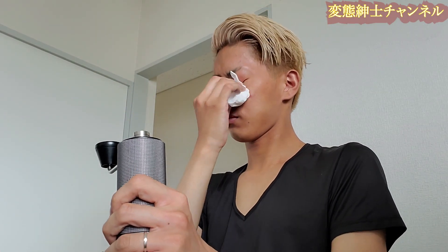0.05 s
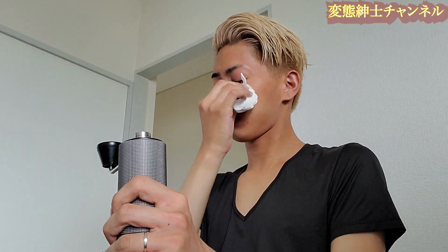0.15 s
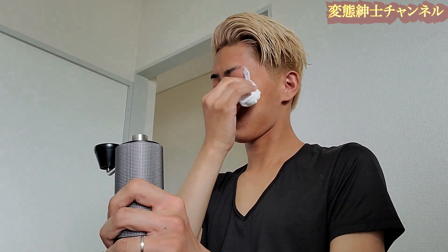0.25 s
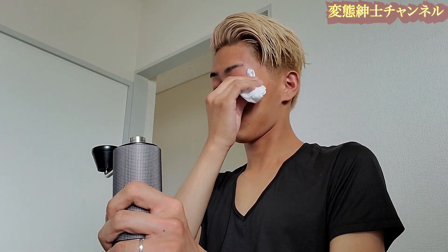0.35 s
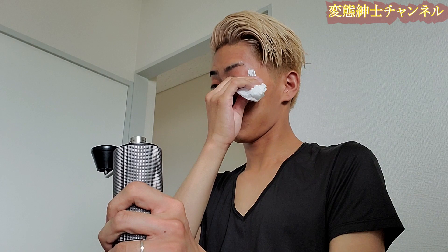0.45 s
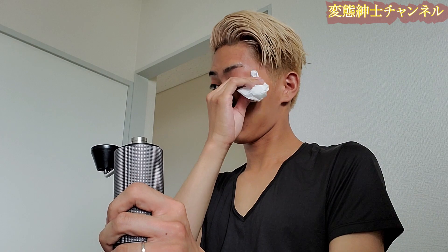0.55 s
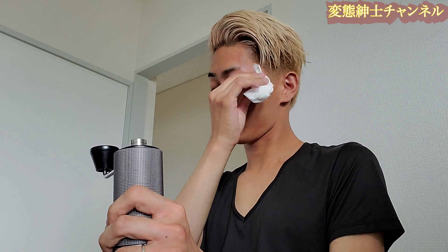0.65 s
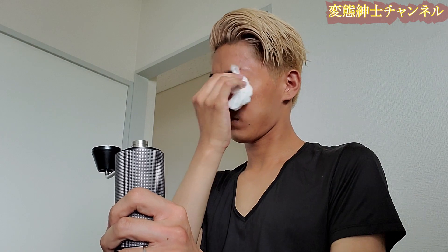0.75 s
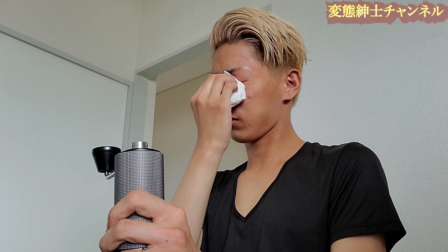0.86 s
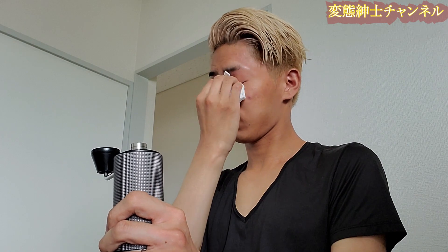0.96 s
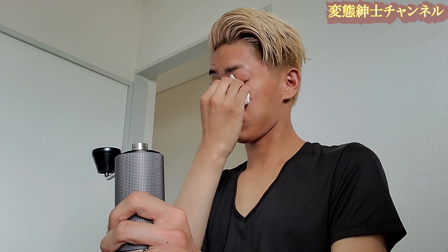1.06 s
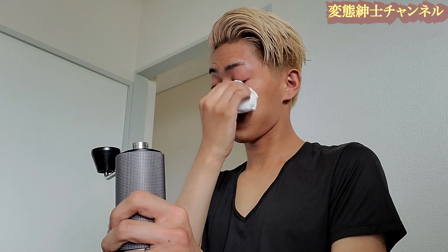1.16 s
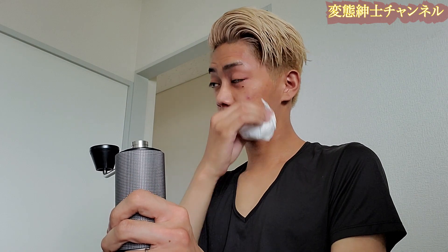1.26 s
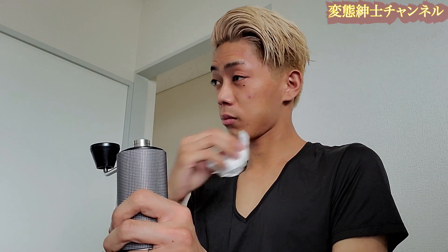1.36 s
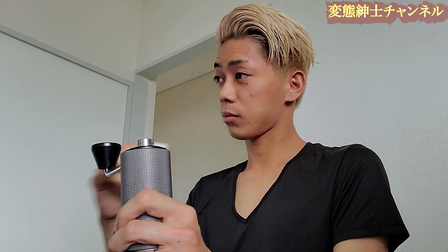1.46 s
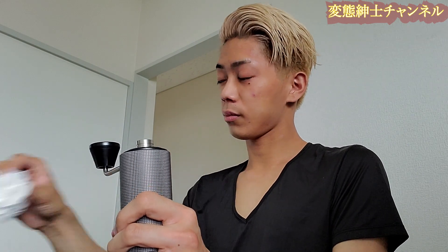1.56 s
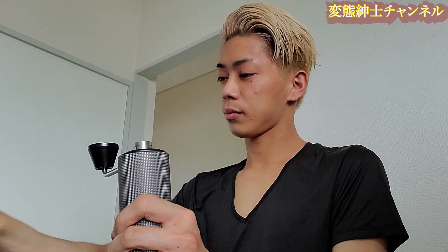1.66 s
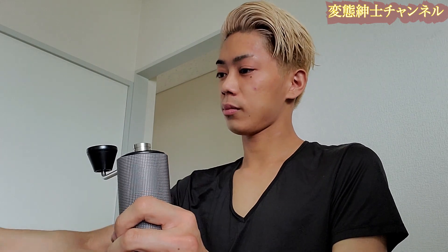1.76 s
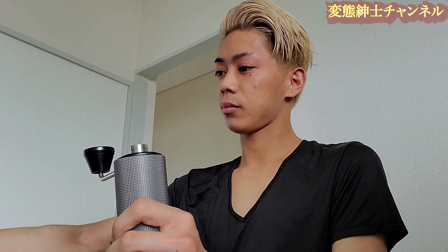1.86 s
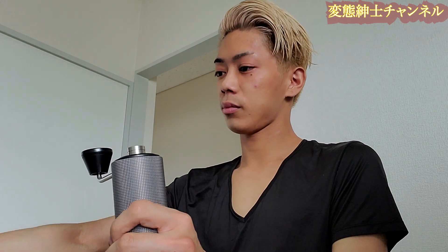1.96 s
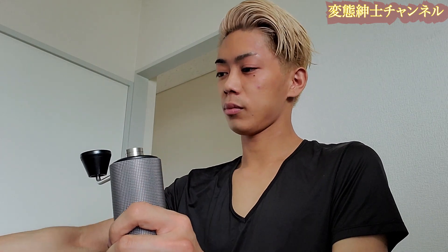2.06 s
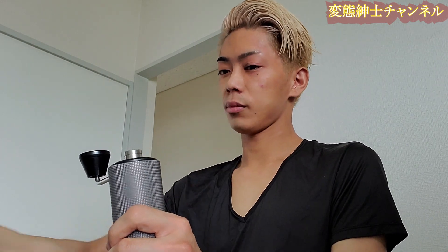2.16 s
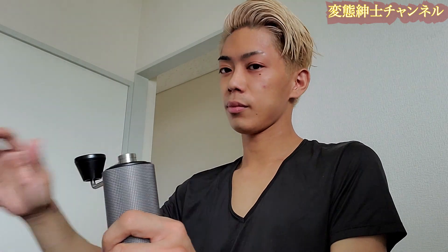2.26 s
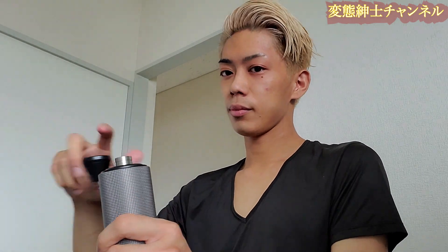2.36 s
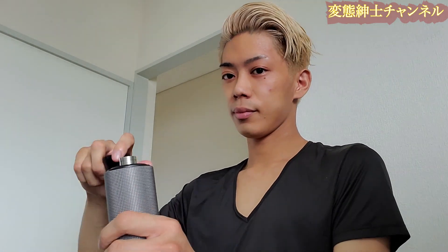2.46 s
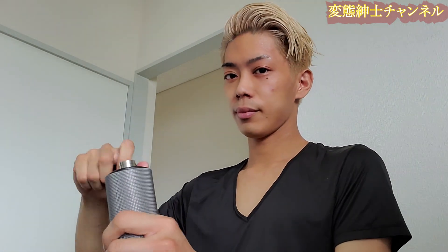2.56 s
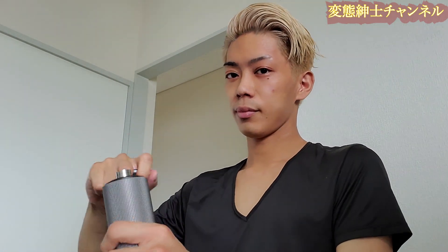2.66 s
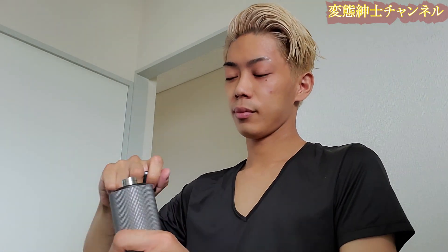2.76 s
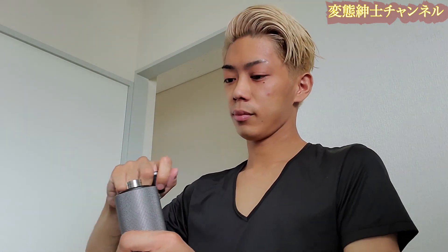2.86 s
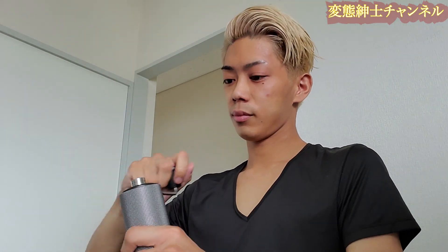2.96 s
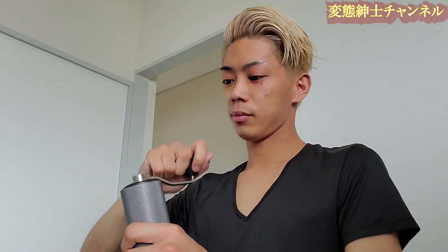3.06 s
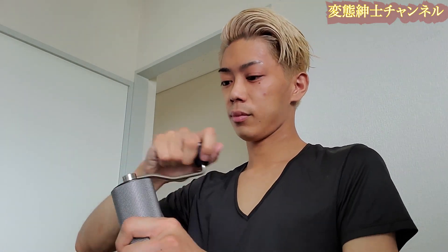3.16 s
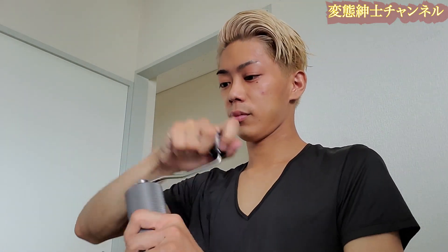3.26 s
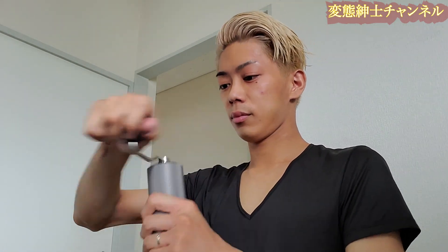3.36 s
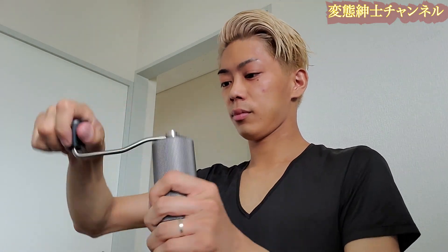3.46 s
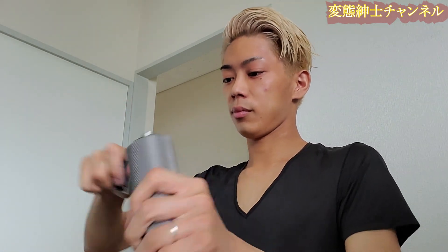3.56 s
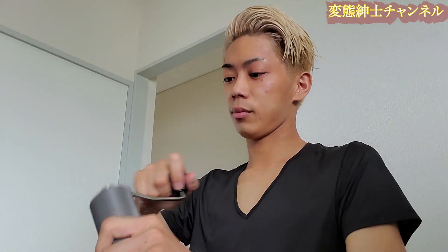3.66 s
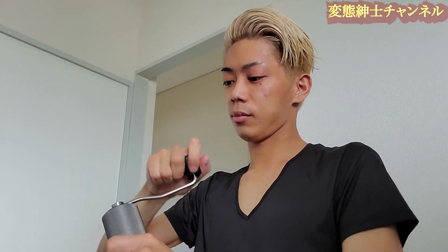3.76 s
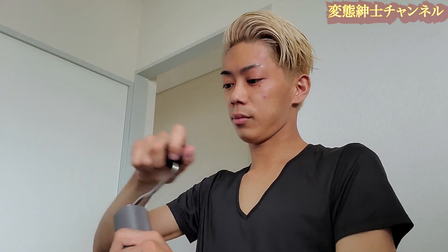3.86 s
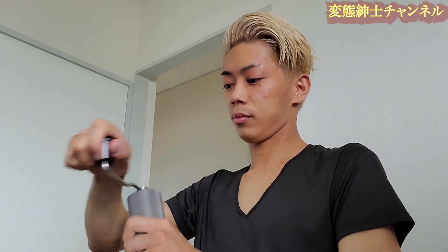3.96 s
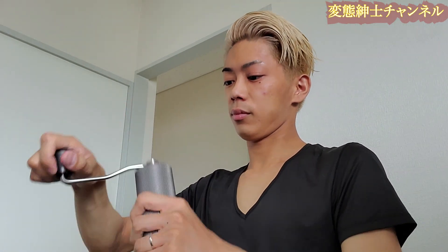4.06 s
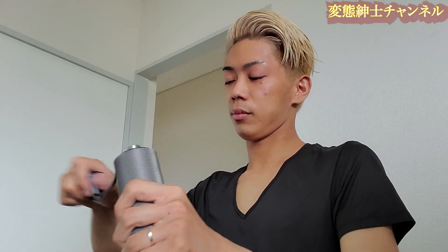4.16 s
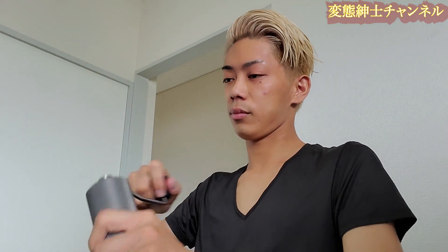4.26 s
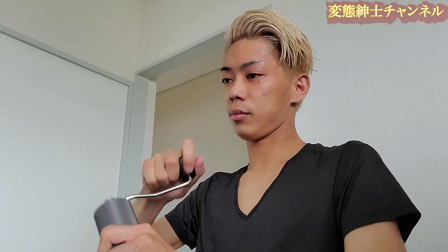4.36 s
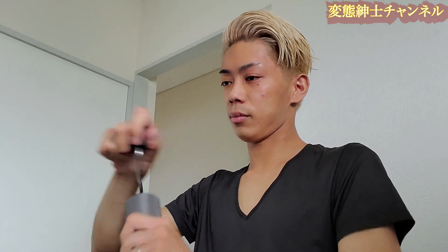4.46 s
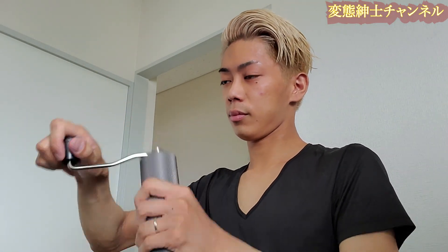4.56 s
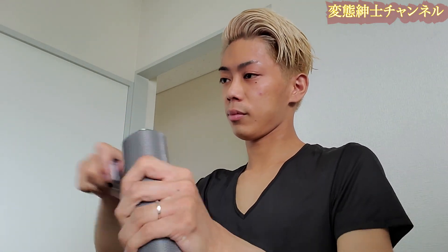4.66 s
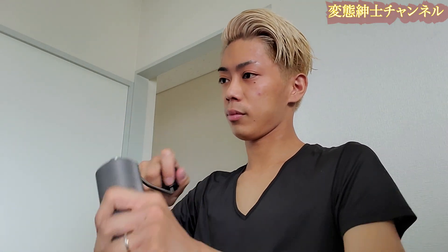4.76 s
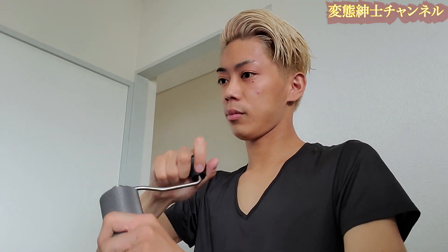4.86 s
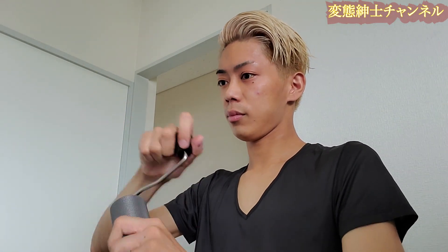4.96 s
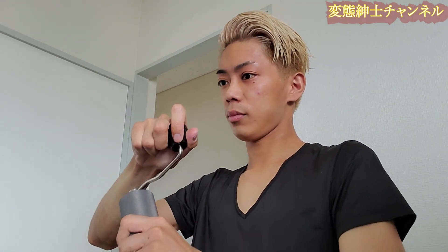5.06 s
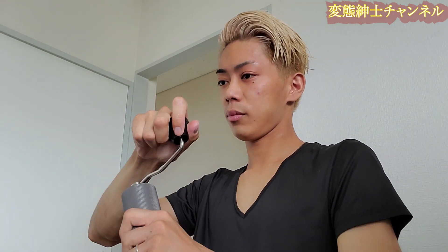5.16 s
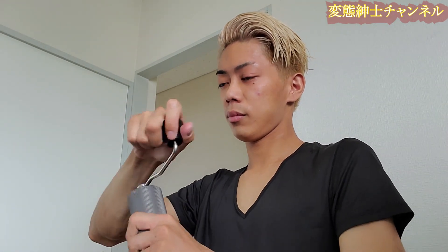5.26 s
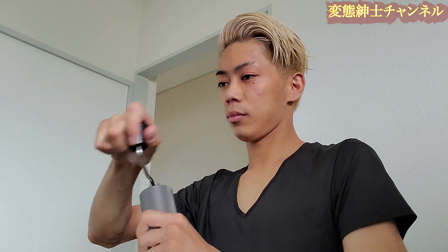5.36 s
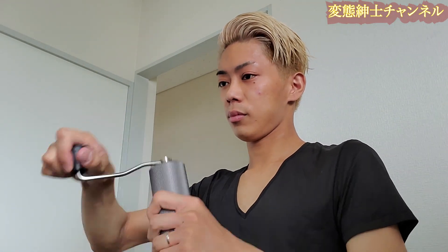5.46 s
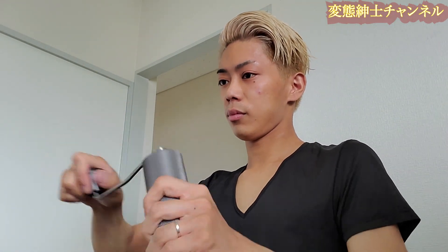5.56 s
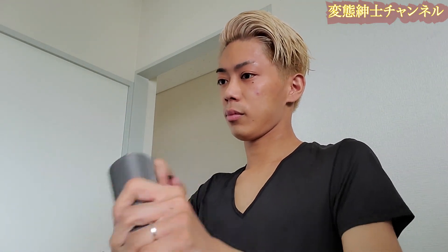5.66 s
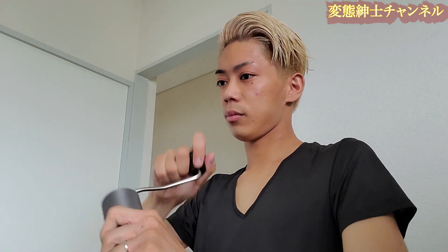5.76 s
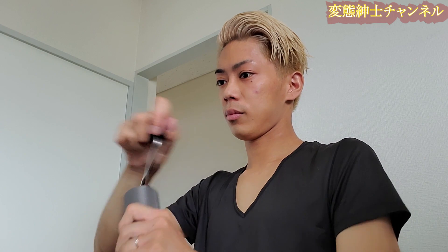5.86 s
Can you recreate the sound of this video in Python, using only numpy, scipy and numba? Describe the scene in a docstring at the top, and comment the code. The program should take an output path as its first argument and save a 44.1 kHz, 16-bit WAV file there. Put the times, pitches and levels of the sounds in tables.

```python
"""Hand-cranked coffee mill

A metal mill grinds in a small quiet room: random fractures excite the damped modes of its body.
Off to the right a tissue wipes skin in two strokes of filtered noise, and something lands on a shelf with a thud.
The handle clicks, then beans crack between the burrs; the table is bumped twice and the crank stalls once.
Two microphones hear it all, and a gain control ducks under the grinding."""
import sys
import numpy as np
from scipy import signal
from scipy.fft import rfft, irfft, next_fast_len
from scipy.io import wavfile
from scipy.ndimage import uniform_filter1d, map_coordinates
from numba import njit

SR = 44100
rng = np.random.default_rng(int(sys.argv[2]) if len(sys.argv) > 2 else 0)


def wrap_up_sound(samples):
    """Save the sound to the file named by the first command line argument, as 16-bit audio."""
    columns = np.atleast_2d(samples).T
    # keep every value between -1 and 1, then stretch to whole-number steps
    tamed = np.clip(columns, -1, 1)
    steps = np.round(tamed * 32767).astype(np.int16)
    wavfile.write(sys.argv[1], SR, steps)


def undo_db(level):
    """Turn decibels back into plain size, where 20 dB means ten times bigger."""
    steps = np.asarray(level, float) / 20
    return 10 ** steps


N = 261072

# Levels in the tables are relative: each source sets its own reference.
# Spectrum of the room's air noise: frequency_hz, density_db (per Hz)
AIR_SPECTRUM = [(20, 4), (45, 5), (200, -3.5), (400, -9.5), (800, -4.5), (1400, -14), (2800, -13.5),
                (4500, -19), (5400, -23.5), (16000, -34)]
# Hum bands: frequency_hz, width_hz, level_db
HUM_BANDS = [(111, 3.2, -54), (339, 27, -59), (444, 3.3, -56.5), (6700, 170, -75), (11000, 420, -71)]
# Decay of the room's answer: frequency_hz, t60_s
WALL_DECAY = [(100, 0.34), (1000, 0.21), (4000, 0.34), (12000, 0.027)]
# Left-right likeness of the sources in front: frequency_hz, likeness (0 to 1)
LIKENESS_FRONT = [(100, 0.94), (500, 0.94), (1500, 0.72), (4000, 0.69), (5500, 0.024), (15000, 0.024)]
# Left-right likeness of the sources on the right and the room: frequency_hz, likeness (0 to 1)
LIKENESS_RIGHT = [(100, 0.93), (300, 1), (600, 0.79), (1400, 0.23), (3000, 0.24), (6000, 0.043),
                  (15000, 0.14)]
# Modes of the table top: frequency_hz, level_db, t60_s
TABLE_MODES = [(124, 0, 0.023), (176, 0.5, 0.061), (234.7, 0.5, 0.055), (356, -2.5, 0.063),
               (436, -3, 0.033), (704, -14.5, 0.044)]
# Bumps of the table: start_s, level_db, bounce_db (re first blow)
TABLE_BUMPS = [(3.664, 3.5, -5.5), (4.279, -2.5, 6)]
# Jolts of an arm on the table: peak_s, level_db
ARM_JOLTS = [(2.44, -45.5), (2.56, -46.5), (2.75, -40.5), (3.17, -48.5), (3.62, -24), (4.07, -27),
             (4.5, -31)]
# Deep passing rumble, one row: start_s, held_s, level_db
DEEP_RUMBLE = (1.68, 1.7, -47)
# Landing on the shelf, first touch and full weight: start_s, level_db, held_s
LANDINGS = [(1.834, -31.5, 0.094), (1.923, -17, 0.044)]
# Modes of the hollow shelf: frequency_hz, width_hz, level_db
SHELF_MODES = [(60, 40, -8), (128, 28, 2), (182, 14, 5), (280, 90, -14)]
# Spectrum of rustling: frequency_hz, density_db (per Hz)
RUSTLE_SPECTRUM = [(710, -30), (1200, -4.5), (3180, -5.5), (4130, -7), (6370, -17), (11200, -20.5),
                   (16000, -29)]
# Things shift under the hand or after a bump: start_s, level_db
SHIFTS = [(.045, -47), (1.021, -40), (2.73, -39), (3.666, -12), (4.279, -10)]
# Strokes of the tissue on skin: start_s, middle_of_full_stroke_s, full_stroke_lasts_s, level_db
WIPE_STROKES = [(0.55, 0.76, 0.088, -26.5), (1.023, 1.185, 0.071, -25)]
# Spectrum of the tissue's hiss on skin: frequency_hz, density_db (per Hz)
TISSUE_SPECTRUM = [(600, -44), (1000, -22), (3200, -19), (4400, -17), (6300, -23), (8200, -15), (11000, -4),
                   (12800, 0), (15300, -5), (16000, -9)]
# Clicks of the crank handle: start_s, level_db, favoured_hz
HANDLE_CLICKS = [(2.337, -10, 2340), (2.392, -22, 1000), (2.429, -26, 1310), (2.594, -23.5, 2150),
                 (2.665, -35.5, 2400), (2.811, -23.5, 2220)]
# Modes of the handle: frequency_hz, level_db, t60_s
HANDLE_MODES = [(997, -8.5, .06), (1690, -6.5, 0.032), (1900, -2.5, 0.027), (2150, -7, 0.041),
                (2366, -2, 0.034), (2790, -7, 0.043), (3140, 0.5, 0.022), (3950, -12, 0.051),
                (5370, -35, .04)]
# Fingers slide on the body before the turn, one row: start_s, held_s, level_db
FINGER_SLIDE = (2.34, .5, -54)
# Whole beans split: start_s, level_db, pitch_hz, snap_db (re the body's part)
BEAN_CRACKS = [(2.881, -24, 2580, -40), (2.901, -16, 2440, -36), (2.959, -19.5, 2890, -26),
               (2.992, -12.5, 2530, -25), (3.017, -17, 2500, -34), (3.076, -15, 2440, -31),
               (3.107, -17, 1120, -22), (3.219, -13, 2230, -25), (3.499, -8.5, 2440, 2),
               (3.786, -5, 2900, -16), (3.891, -26.5, 2200, -49), (4.532, -2.5, 960, -35),
               (4.804, -12, 2960, -42), (4.921, -6, 2300, -19), (5.265, -50, 1120, -29),
               (5.277, -12, 2620, -25), (5.376, -15.5, 1130, -15), (5.481, -9, 2500, -31),
               (5.782, -11, 3000, -13)]
# Modes of the mill's body: frequency_hz, width_hz, level_db
BODY_MODES = [(1018, 206, -1.5), (1170, 294, -7), (2080, 435, -5), (2440, 280, -5), (2740, 300, -8),
              (3280, 570, -10), (3884, 346, -7.5), (4420, 310, -11)]
# Push on the crank: time_s, push_db
CRANK_PUSH = [(2.8, -54), (2.895, -57.5), (2.905, -45.5), (2.96, -35.5), (3.08, -32.5), (3.15, -29),
              (3.26, -25.5), (3.5, -23), (3.65, -27), (3.72, -32), (3.95, -27.5), (4.24, -25.5),
              (4.44, -30), (4.64, -26), (4.85, -29.5), (4.96, -26), (5.02, -42), (5.2, -72.5), (5.257, -88),
              (5.263, -34), (5.48, -29.5), (5.56, -28.5), (5.7, -25.5), (5.8, -28.5), (5.9, -25),
              (5.92, -29)]
# Burrs run empty: start_s, end_s, dip_db
EMPTY_BURRS = [(2.938, 2.955, -24), (2.981, 2.989, -16), (3.03, 3.084, -35), (3.086, 3.096, -18),
               (3.189, 3.219, -13), (4.746, 4.794, -5), (4.872, 4.922, -9), (5.282, 5.297, -13),
               (5.333, 5.364, -11)]
# Spectrum of the rubbing burrs: frequency_hz, density_db (per Hz)
BURR_SPECTRUM = [(2590, -6), (4400, -5.5), (4850, -3), (6020, -8), (6530, -2), (7550, -7), (8690, -1),
                 (9420, -5.5), (11600, -1), (13500, -3.5), (16000, -15)]
# Brief swells of the bright rub: peak_s, lift_db
RUB_SWELLS = [(3.29, 4), (3.5, 7), (4.13, 5.5), (4.62, 3), (5.55, 5.5)]
# Modes of the grounds cup, whose response is squared in use: frequency_hz, width_hz, level_db
CUP_MODES = [(514, 235, 2), (667, 250, 2)]
# Mode of the loosely held lid, one row: frequency_hz, width_hz, level_db (re crunch)
LID_MODE = (2435, 62, -9)
# The lid sings louder: peak_s, lift_db
LID_SWELLS = [(2.86, 11), (3.33, 8.5), (5.05, 7), (5.9, 6.5)]

RIGHT_LAG_S = 0.000426  # sound from the right reaches the left microphone late
TOP_HZ = 15800  # upper limit of the microphones
REST_DB = -54.5  # tremble of the table under resting arms, before it wobbles
JOLT_RISE_S, JOLT_T60_S = 0.085, 0.45
RUMBLE_RISE_S, RUMBLE_T60_S = 0.1, 1.1
THUD_RISE_S, SHELF_T60_S = 0.0045, 0.41
KNOCK_DB, KNOCK_T60_S = -4.5, 0.48  # re the full weight
THUD_RUSTLE_DB, THUD_RUSTLE_T60_S = -13, 0.64  # re the full weight
SHIFT_RISE_S, SHIFT_T60_S = 0.0065, 0.29
PRESS_DELAY_S, WIPE_T60_S = 0.036, 0.23  # the tissue presses a little after it touches
TOUCH_DB, PRESS_DB = -29, -14.5  # light touch and first press, re full stroke
CLICK_WIDTH_HZ, SCRAPE_S, EDGE_DB = 740, 0.0067, -27  # favoured band, contact time, bright edge
RUB_DB, RUB_PIVOT_DB = -30.5, -27  # rub level at the pivot push
RUB_FOLLOWS, RUB_SLACK = 0.92, 0.44  # dB of rub per dB of push, and per dB of dip when empty
RUB_SWELL_S, LID_SWELL_S = 0.045, 0.079  # half widths
CHIPS_PER_S, CHIP_DB, CHIP_SPREAD_DB = 250, 2, 4  # level re push
CHIP_HZ, CHIP_OCTAVES, CHIP_CYCLES = 2200, 0.55, 6.7  # middle pitch, its spread, cycles per 30 dB decay


def unit(x):
    """Normalisation: x scaled to rms 1."""
    return x / np.sqrt(np.mean(x ** 2) + 1e-20)


def along(points, hz):
    """Interpolation of (Hz, value) points on a logarithmic frequency axis."""
    f, value = np.transpose(points)
    return np.interp(np.log(hz + 1), np.log(f + 1), value)


def wobble(rate):
    """Slow modulation: a smooth random curve, rate knots a second."""
    knots = rng.standard_normal(int(N * rate / SR) + 4)
    return map_coordinates(knots, [np.arange(N) * rate / SR])


def white():
    """Two unrelated white noises."""
    return rng.standard_normal((2, N))


def filtered(x, response):
    """Linear filtering: the spectrum of x times a complex response of frequency."""
    m = next_fast_len(N + SR // 2)
    return irfft(rfft(x, m) * response(np.fft.rfftfreq(m, 1 / SR)), m)[..., :N]


def resonance(f, hz, width):
    """Damped harmonic oscillator: the causal response of one mode."""
    return 1j * f * width / (hz * hz - f * f + 1j * f * width)


def modes(rows):
    """Modal superposition: neighbouring modes add with alternating sign."""
    return lambda f: sum((-1) ** k * undo_db(db) * resonance(f, hz, width)
                         for k, (hz, width, db) in enumerate(rows))


def noise(spectrum):
    """Spectral shaping: two unrelated coloured noises of rms 1."""
    return unit(filtered(white(), lambda f: undo_db(along(spectrum, f))))


def grit(rate, spread_db):
    """Random impulse process: two trains at shared moments, with exponential sizes in dB, capped."""
    size_db = spread_db * np.minimum(rng.exponential(size=N), 3)
    size = (rng.random(N) < rate / SR) * undo_db(size_db)
    return size * white()


def envelope(start, db, rise, hold, t60):
    """Exponential decay: gain that rises from start, holds and dies away."""
    t = np.arange(N) / SR - start
    return np.clip(t / rise, 0, 1) * undo_db(db - 60 * np.maximum(t - rise - hold, 0) / t60)


def swells(rows, half_s):
    """Gaussian modulation: bell-shaped lifts in dB around given moments."""
    t = np.arange(N) / SR
    return sum(db * np.exp(-((t - s) / half_s) ** 2) for s, db in rows)


def spread(pair, likeness, lag_s=0):
    """Interchannel coherence: unrelated signals mixed to a given likeness; above the bass the left may lag."""
    def turn(f):
        return np.arccos(np.clip(along(likeness, f), -1, 1)) / 2

    def late(f):
        lag = lag_s * np.clip(f / 300, 0, 1) * np.array([[1], [-1]])
        return np.exp(-1j * np.pi * f * lag)  # half the lag on each side

    mid, side = filtered(pair, lambda f: np.array([np.cos(turn(f)), np.sin(turn(f))]))
    return filtered(np.array([mid + side, mid - side]), late)


def room_tone():
    """Stationary noise: coloured air noise with hum as narrow resonant bands of noise."""
    hum = sum(undo_db(db) * unit(filtered(white(), lambda f: resonance(f, hz, width)))
              for hz, width, db in HUM_BANDS)
    return undo_db(-48.5) * noise(AIR_SPECTRUM) + hum


def walls(x):
    """Reverberation: convolution with noise in which each frequency dies at its own speed."""
    hz, t, z = signal.stft(rng.standard_normal((2, SR // 2)), SR, nperseg=256)
    decay = undo_db(-60 * t / along(WALL_DECAY, hz)[:, None])
    tail = signal.istft(z * decay, SR, nperseg=256)[1]
    tail = tail / np.linalg.norm(tail[0])
    delayed = np.pad(x, ((0, 0), (200, 0)))
    return signal.fftconvolve(delayed, tail, axes=1)[:, :N]


def rumble():
    """Resonant filtering: a deep band of noise rises, holds and dies away."""
    s, held, db = DEEP_RUMBLE
    deep = unit(filtered(white(), lambda f: resonance(f, 41, 33) ** 2))
    return envelope(s, db, RUMBLE_RISE_S, held, RUMBLE_T60_S) * deep


def table_tremble():
    """Forced vibration: resting and jolting arms drive the table's modes with noise."""
    # a mode's bandwidth follows from its decay time
    rows = [(hz, np.log(1000) / (np.pi * t60), db) for hz, db, t60 in TABLE_MODES]
    arms = undo_db(REST_DB) + sum(envelope(s - JOLT_RISE_S, db, JOLT_RISE_S, 0, JOLT_T60_S)
                              for s, db in ARM_JOLTS)
    return arms * undo_db(2.26 * wobble(10.0)) * unit(filtered(white(), modes(rows)))


def table_bumps():
    """Free vibration: each bump rings the table's decaying modes and bounces once."""
    t = np.arange(SR // 2) / SR
    out = np.zeros((2, N + SR))
    soft = 1 - np.exp(-(t / 0.0007) ** 2)
    quarter = np.array([[0], [np.pi / 2]])  # the board moves out of step under the two microphones
    for s, db, bounce_db in TABLE_BUMPS:
        for at, blow_db in ((s, db), (s + 0.0091, db + bounce_db)):
            ring = sum(undo_db(level + rng.normal() - 60 * t / t60) * np.sin(2 * np.pi * hz * t - quarter)
                       for hz, level, t60 in TABLE_MODES)
            out[:, round(at * SR):][:, :len(t)] -= undo_db(blow_db) * ring * soft
    return out[:, :N]


def thud():
    """Impact excitation: a run of knocks rings a hollow shelf, under a rustle."""
    blows = unit(grit(rate=2500, spread_db=1.5))

    def dull(f):
        return resonance(f, 690, 660) ** 2

    def driven(load, response):
        gain = 1 / np.sqrt(np.mean(filtered(blows, response) ** 2))
        return gain * filtered(load * blows, response)

    load = sum(envelope(s, db, THUD_RISE_S, held, SHELF_T60_S) for s, db, held in LANDINGS)
    s, db, held = LANDINGS[-1]  # knock and rustle go with the full weight
    knock_load = envelope(s, db + KNOCK_DB, THUD_RISE_S, held, KNOCK_T60_S)
    rustle_level = envelope(s, db + THUD_RUSTLE_DB, THUD_RISE_S, held, THUD_RUSTLE_T60_S)
    return driven(load, modes(SHELF_MODES)) + driven(knock_load, dull) + rustle_level * noise(RUSTLE_SPECTRUM)


def shuffles():
    """Frictional noise: dull puffs that die away exponentially."""
    level = sum(envelope(s, db, SHIFT_RISE_S, 0, SHIFT_T60_S) for s, db in SHIFTS)
    return level * unit(filtered(white(), lambda f: resonance(f, 430, 620) ** 2))


def wipes():
    """Frictional noise: a tissue touches skin lightly, presses, swells to a fine hiss and lifts away."""
    t, stroke = np.arange(N) / SR, 0
    for start, middle, lasts, db in WIPE_STROKES:
        full, ends = middle - lasts / 2, middle + lasts / 2
        presses = start + PRESS_DELAY_S
        swell_db = np.interp(t, [presses, full], [PRESS_DB, 0])
        fall_db = 60 * (np.maximum(t - ends, 0) / WIPE_T60_S) ** 1.22
        stroke = stroke + (t > start) * undo_db(db + np.where(t < presses, TOUCH_DB, swell_db - fall_db))
    return stroke * undo_db(0.46 * wobble(37.5)) * noise(TISSUE_SPECTRUM)


def finger_slide():
    """Frictional noise: fingers slide unevenly on the body."""
    s, held, db = FINGER_SLIDE
    return envelope(s, db, 0.05, held, 0.5) * undo_db(1.7 * wobble(12.08)) * noise(RUSTLE_SPECTRUM)


def clicks():
    """Modal excitation: a short scraping contact rings the handle, most of all near its favoured pitch."""
    t = np.arange(SR // 4) / SR
    out = np.zeros((2, N + len(t)))
    for s, db, favoured_hz in HANDLE_CLICKS:
        contact = rng.standard_normal((2, SR // 50)) * np.exp(-(t[:SR // 50] / SCRAPE_S) ** 4)
        ring = 0
        for hz, level, t60 in HANDLE_MODES:
            favour = np.abs(resonance(hz, favoured_hz, CLICK_WIDTH_HZ))
            ring = ring + favour * undo_db(level - 60 * t / t60) * np.sin(2 * np.pi * hz * t)
        click = signal.fftconvolve(contact, ring[None], axes=1)[:, :len(t)]
        edge = np.pad(np.diff(contact, n=2), ((0, 0), (0, len(t))))[:, :len(t)]
        out[:, round(s * SR):][:, :len(t)] += undo_db(db) * (click / np.abs(click).max() + undo_db(EDGE_DB) * edge)
    return out[:, :N]


def cracks():
    """Brittle fracture: a bean splits in a dry burst near its pitch, coloured by the body, with a bright snap."""
    t = np.arange(SR // 20) / SR
    f = np.fft.rfftfreq(len(t), 1 / SR)
    colour = modes(BODY_MODES)(f) + 0.41 * resonance(f, 3200, 1700)
    out = np.zeros((2, N + len(t)))
    for s, db, hz, snap_db in BEAN_CRACKS:
        burst = rfft(rng.standard_normal((2, len(t))) * undo_db(-60 * (t / 0.011) ** 2))
        body = irfft(burst * colour * resonance(f, hz, 1130), len(t))
        snap = irfft(burst * resonance(f, 9600, 5500) ** 2, len(t))
        split = undo_db(4) * body / np.abs(body).max() + undo_db(snap_db + 5) * snap
        out[:, round(s * SR):][:, :len(t)] += undo_db(db) * split
    return out[:, :N]


def chips():
    """Granular superposition: shell chips break off at random, each a few cycles at its own pitch."""
    when, high, big, left = rng.random((3000, 4)).T
    keep = np.arange(len(when)) < CHIPS_PER_S * N / SR
    octaves = CHIP_OCTAVES * np.log(high / (1 - high)) / 2  # logistic scatter of pitch
    hz = np.clip(CHIP_HZ * 2 ** octaves, 600, 4500)[:, None]
    n = np.arange(600)
    size_db = -CHIP_SPREAD_DB * np.log(big + 0.014)[:, None]
    decay_db = 30 * n / SR * hz / CHIP_CYCLES
    grain = undo_db(size_db - decay_db) * np.sin(2 * np.pi * hz * n / SR) * keep[:, None]
    at = ((when * N).astype(int)[:, None] + n).ravel()
    sides = np.cos(2 * np.pi * left), np.sin(2 * np.pi * left)
    return unit(np.array([np.bincount(at, (grain * side[:, None]).ravel(), N + len(n))[:N]
                          for side in sides]))


def bite():
    """Load control: the push sets crunch and rub, dips where the burrs run empty and bites again at once."""
    t = np.arange(N) / SR
    slack_db = sum(db * np.clip((t - start) / 0.0034, 0, 1) * (t < end) for start, end, db in EMPTY_BURRS)
    push_db = np.interp(t, *np.transpose(CRANK_PUSH), left=-120, right=-120)
    rub_db = RUB_DB + RUB_FOLLOWS * (push_db - RUB_PIVOT_DB) + RUB_SLACK * slack_db
    return undo_db(push_db + slack_db), undo_db(rub_db + swells(RUB_SWELLS, RUB_SWELL_S))


def body_crunch(clumps, shared):
    """Modal excitation: most fractures favour one mode of the body, so the colour keeps shifting."""
    crunch = 0
    for k, (hz, width, db) in enumerate(BODY_MODES):
        own = 1.5 * unit(grit(rate=1000, spread_db=2.5)) * undo_db(2.5 * wobble(18))
        mode = lambda f: (-1) ** k * undo_db(db) * resonance(f, hz, width) * resonance(f, hz, 4 * width)
        crunch = crunch + filtered(clumps * (shared + own), mode)
    # the body passes little above its top mode
    return unit(filtered(crunch, lambda f: 1 / (1 + (f / 4550) ** 16)))


def burr_rub(clumps, shared):
    """Frictional noise: fractures and steady noise are coloured by the burrs."""
    rub = clumps * (0.88 * shared + white())
    return unit(filtered(rub, lambda f: undo_db(along(BURR_SPECTRUM, f))))


def cup_boom(clumps, shared):
    """Cavity resonance: fractures excite the grounds cup."""
    blows = clumps * (shared + unit(grit(rate=600, spread_db=1.5)))
    return unit(filtered(blows, lambda f: modes(CUP_MODES)(f) ** 2))


def lid_ring(clumps, shared):
    """Sympathetic resonance: the fractures make the loosely held lid sing, louder at some moments."""
    hz, width, db = LID_MODE
    ring = unit(filtered(clumps * shared, lambda f: resonance(f, hz, width)))
    return undo_db(db + swells(LID_SWELLS, LID_SWELL_S)) * ring


def grinding():
    """Stochastic excitation: beans fracture in clumps and drive body, burrs, cup and lid."""
    push, rubbing = bite()
    clumps = undo_db(0.87 * wobble(60) + 0.21 * wobble(21))
    shared = unit(grit(rate=800, spread_db=-1.0))
    crunch = undo_db(9.0) * (body_crunch(clumps, shared) + lid_ring(clumps, shared))
    # the extra push factor: the cup booms only once the burrs are well loaded
    boom = undo_db(19) * push * cup_boom(clumps, shared)
    return push * (crunch + undo_db(CHIP_DB) * chips() + boom) + rubbing * burr_rub(clumps, shared)


def scene():
    """Superposition: the mill is in front; tissue, table, shelf and room tone come from the right."""
    mill = spread(grinding() + cracks() + clicks() + finger_slide(), LIKENESS_FRONT)
    right = table_bumps() + table_tremble() + rumble() + thud() + shuffles() + wipes()
    right = spread(right, LIKENESS_RIGHT, RIGHT_LAG_S)
    echo = undo_db(-11) * walls(mill + right)
    room = spread(echo + room_tone(), LIKENESS_RIGHT, RIGHT_LAG_S)
    return mill + right + room


@njit
def follow(level_db, attack, release):
    """Envelope detection: a level follower that rises faster than it falls."""
    out, held = np.empty_like(level_db), level_db[0]
    for i in range(len(level_db)):
        held += (level_db[i] - held) * (attack if level_db[i] > held else release)
        out[i] = held
    return out


def top_cut(x):
    """Nothing passes above the cut-off."""
    return signal.sosfilt(signal.butter(12, 16380, fs=SR, output="sos"), x)


def record(dry):
    """Compression: the microphones lose deepest bass; gain control ducks long loud passages, recovers slowly."""
    heard = filtered(dry, lambda f: (f < TOP_HZ) * (1j * f / (1j * f + 45)) ** 2)
    power = np.abs(uniform_filter1d(np.mean(heard ** 2, 0), size=441))
    level_db = 10 * np.log10(power + 1e-12)
    held_db = follow(level_db, 1 / (0.3 * SR), 1 / (1.2 * SR))  # time constants 0.3 s and 1.2 s
    ducked = heard * undo_db(-0.4 * np.maximum(held_db + 39, 0))  # 0.4 dB down per dB above -39 dB
    return top_cut(ducked)


dry = scene()
out = record(dry)
wrap_up_sound(out)
```